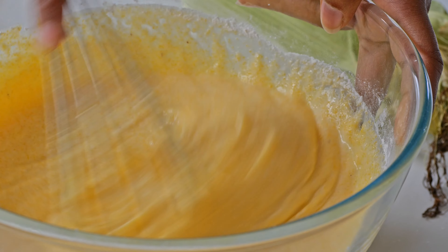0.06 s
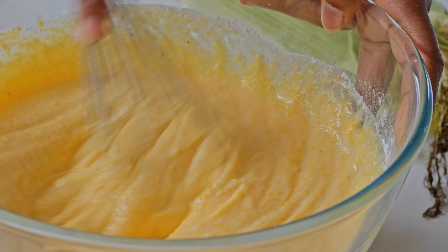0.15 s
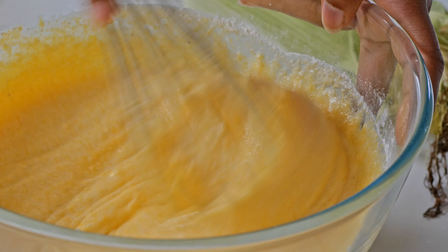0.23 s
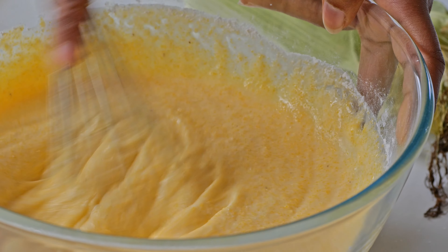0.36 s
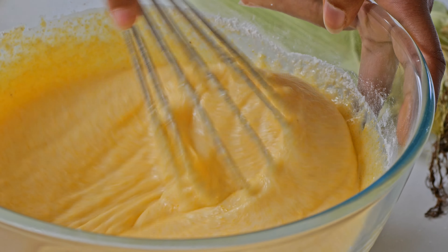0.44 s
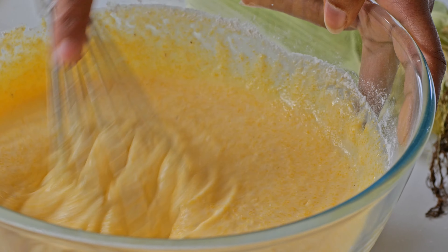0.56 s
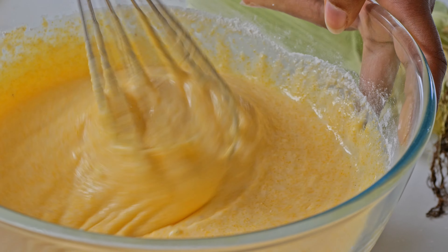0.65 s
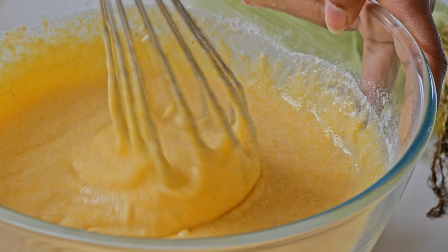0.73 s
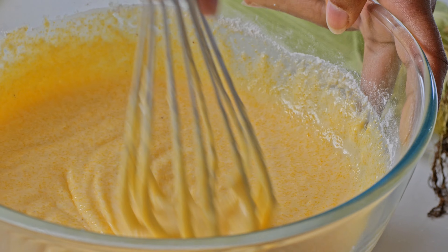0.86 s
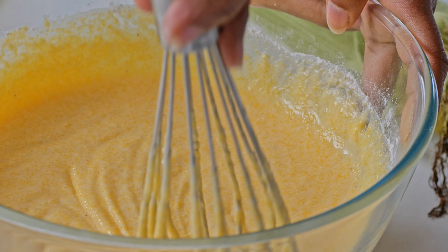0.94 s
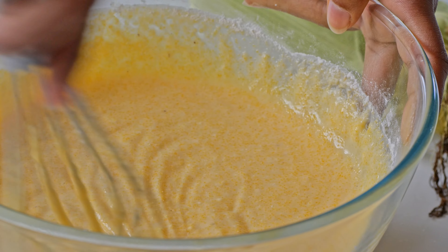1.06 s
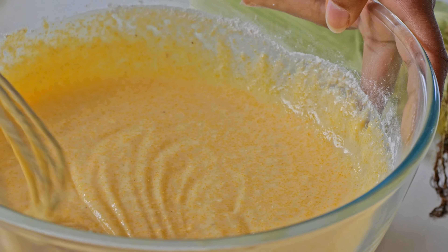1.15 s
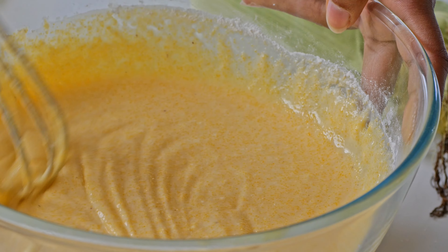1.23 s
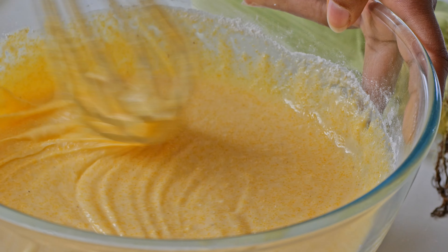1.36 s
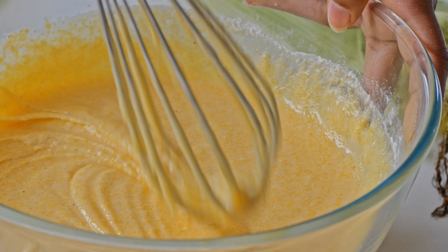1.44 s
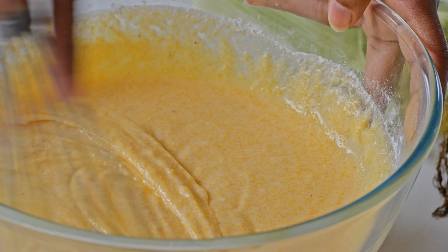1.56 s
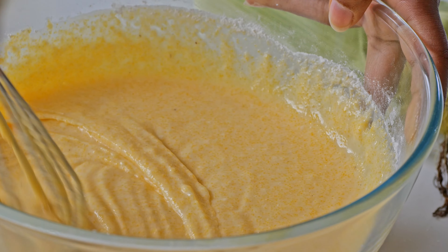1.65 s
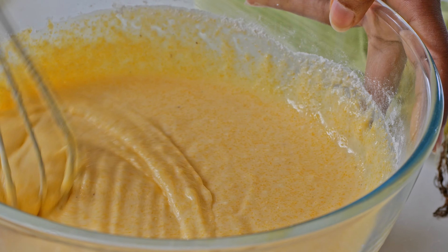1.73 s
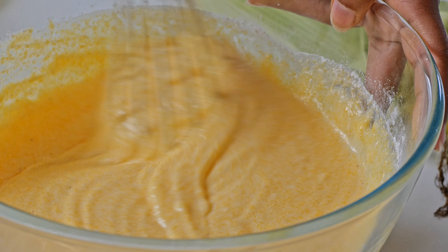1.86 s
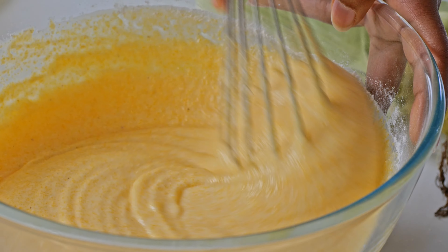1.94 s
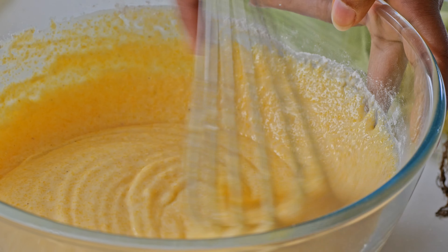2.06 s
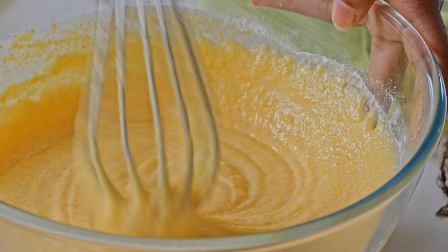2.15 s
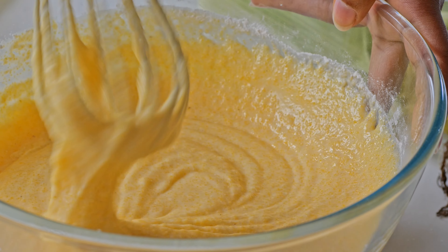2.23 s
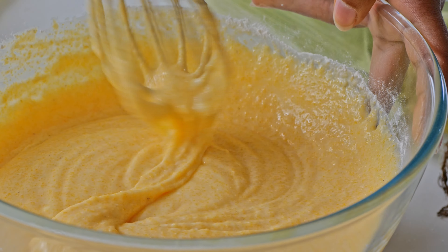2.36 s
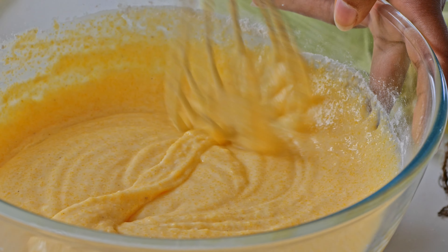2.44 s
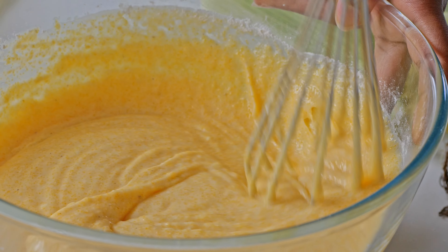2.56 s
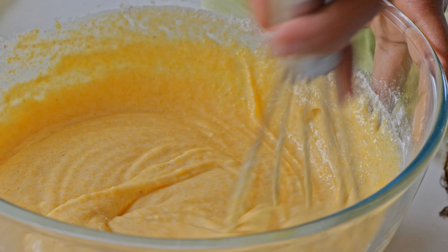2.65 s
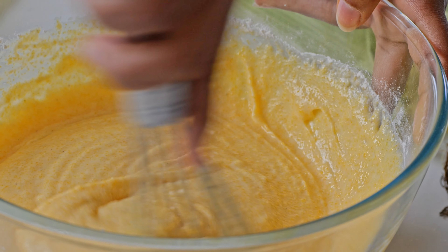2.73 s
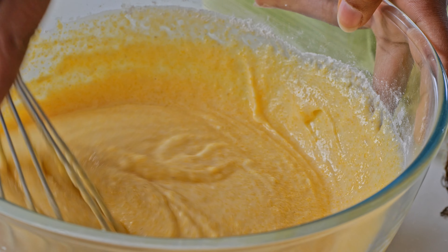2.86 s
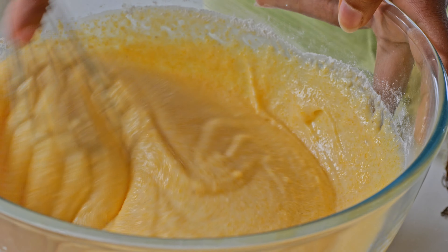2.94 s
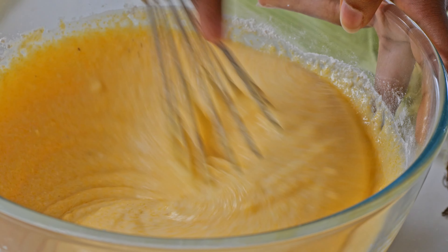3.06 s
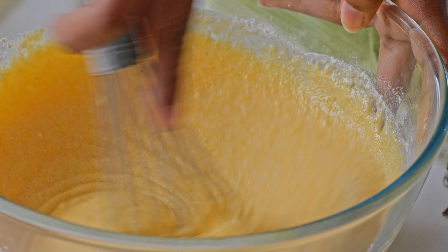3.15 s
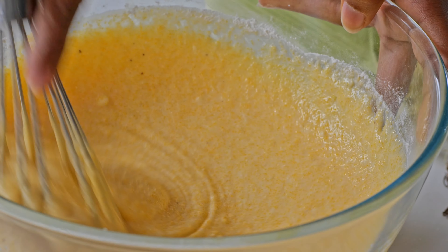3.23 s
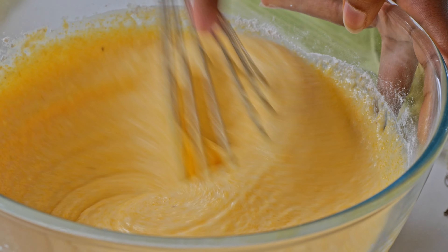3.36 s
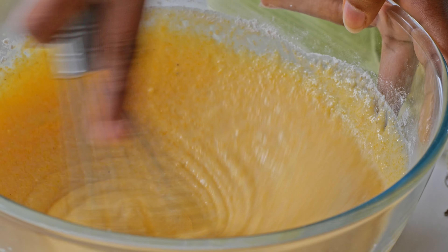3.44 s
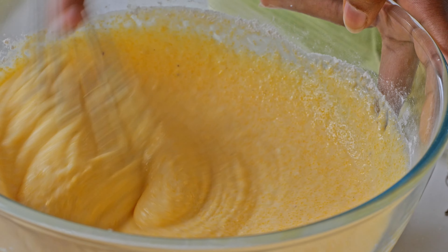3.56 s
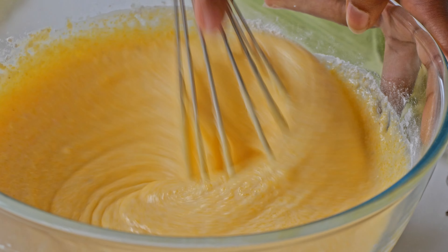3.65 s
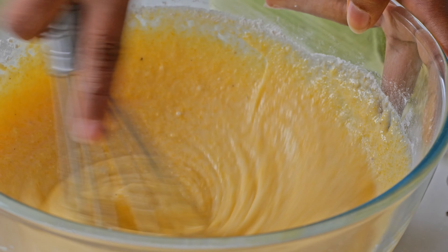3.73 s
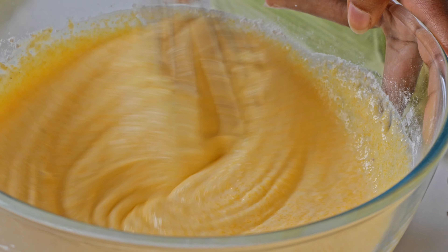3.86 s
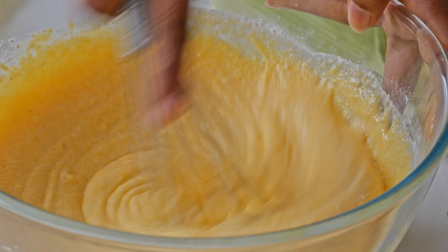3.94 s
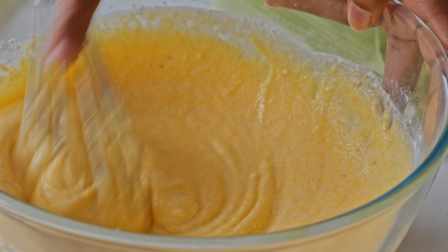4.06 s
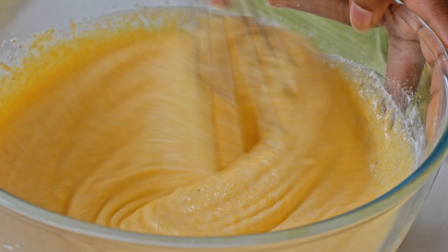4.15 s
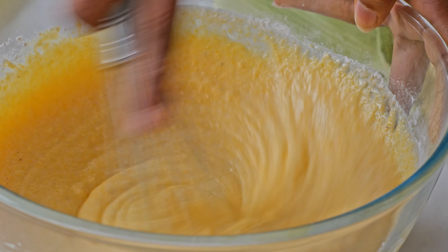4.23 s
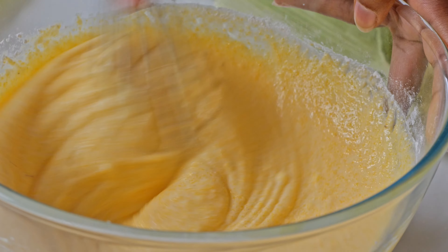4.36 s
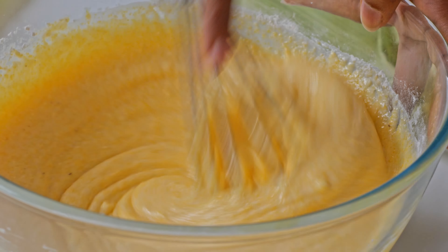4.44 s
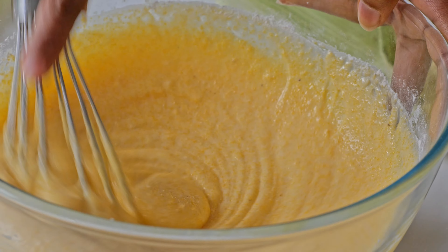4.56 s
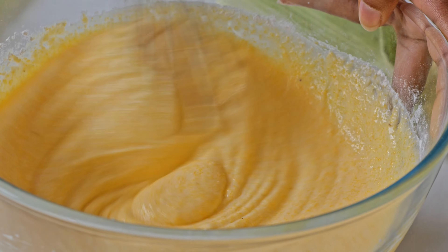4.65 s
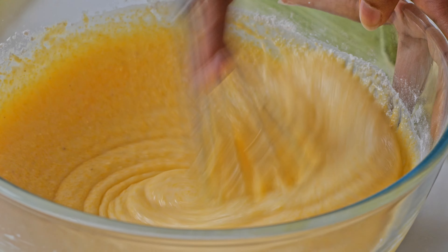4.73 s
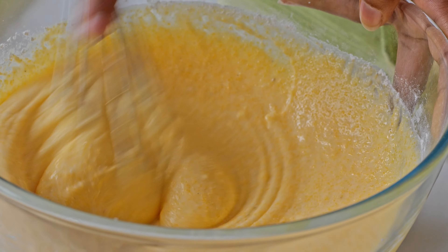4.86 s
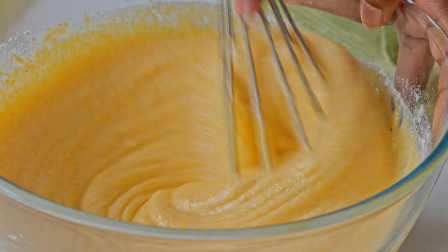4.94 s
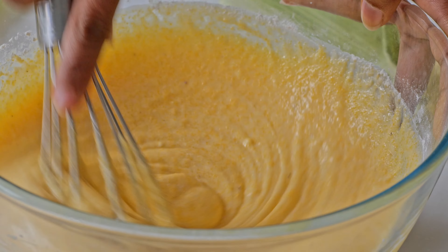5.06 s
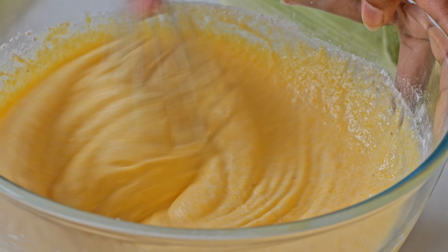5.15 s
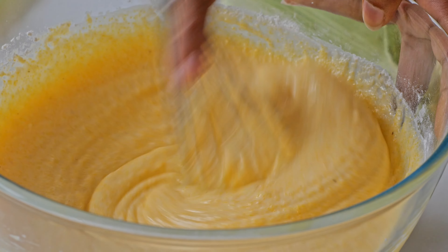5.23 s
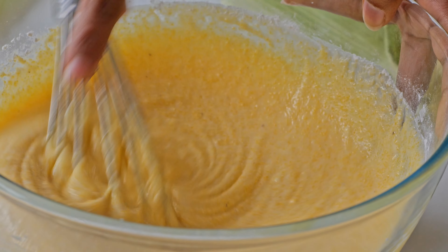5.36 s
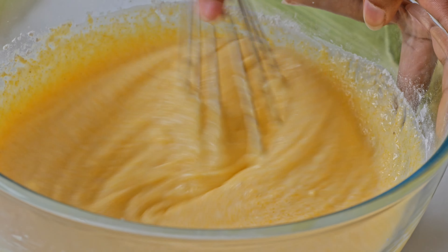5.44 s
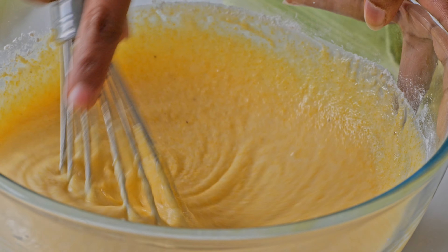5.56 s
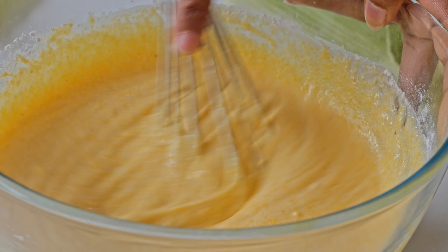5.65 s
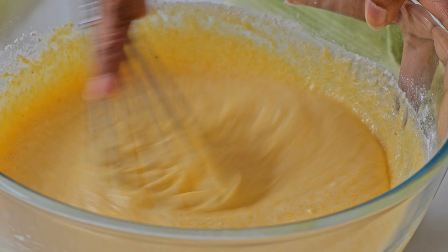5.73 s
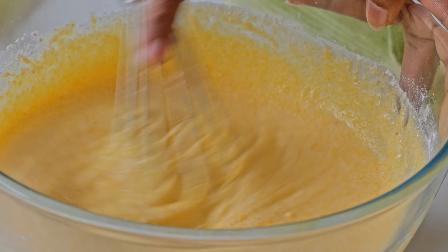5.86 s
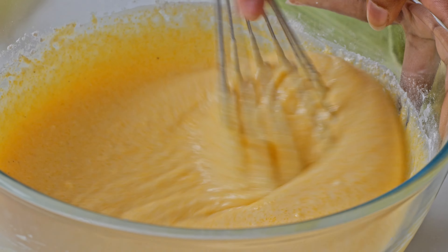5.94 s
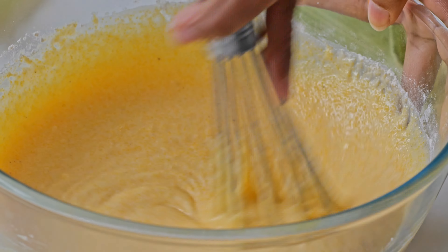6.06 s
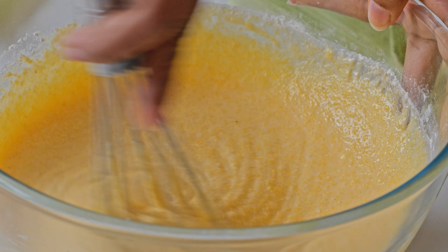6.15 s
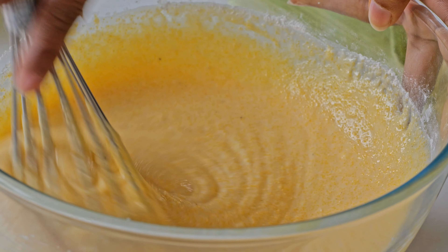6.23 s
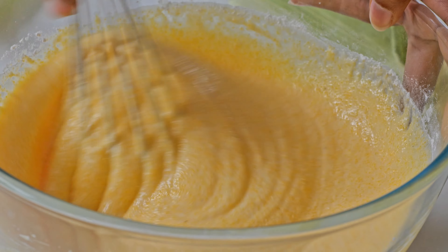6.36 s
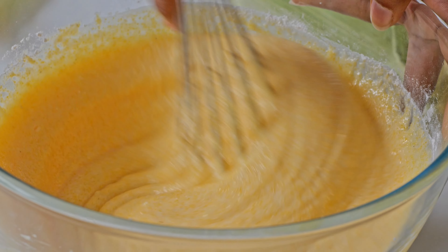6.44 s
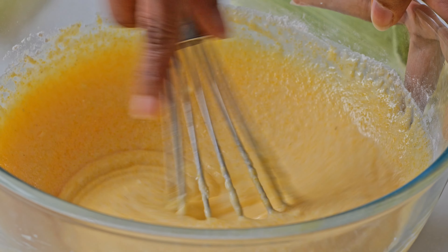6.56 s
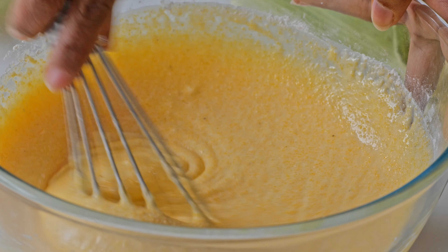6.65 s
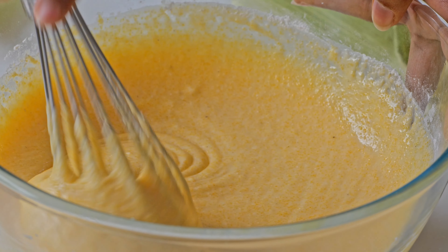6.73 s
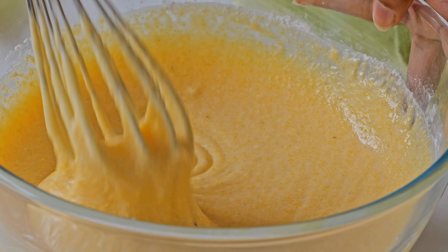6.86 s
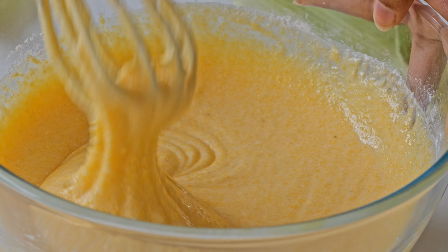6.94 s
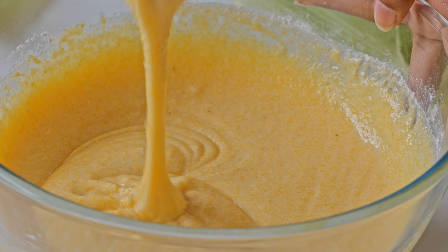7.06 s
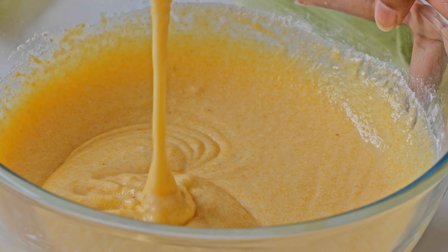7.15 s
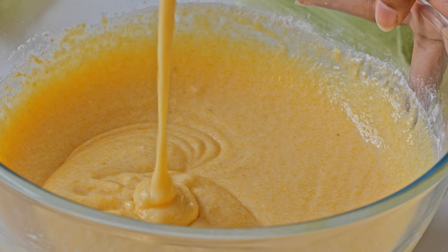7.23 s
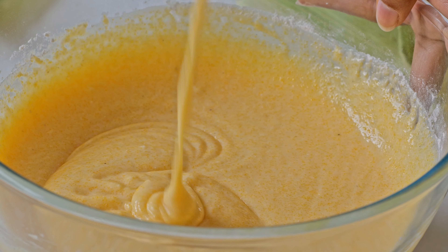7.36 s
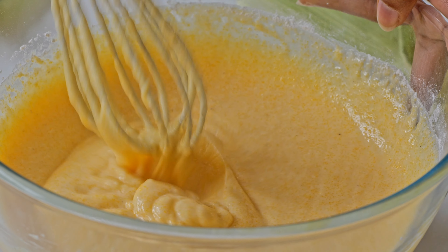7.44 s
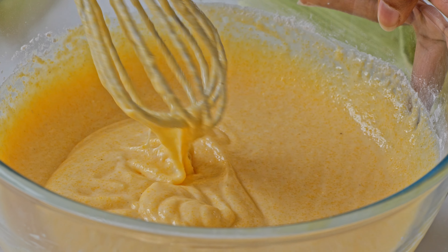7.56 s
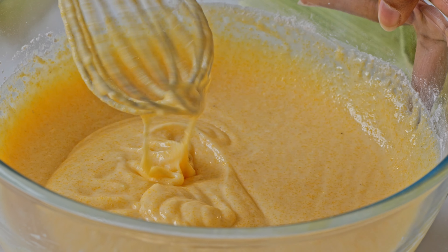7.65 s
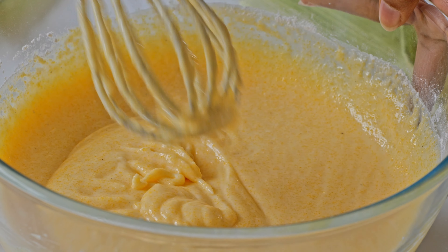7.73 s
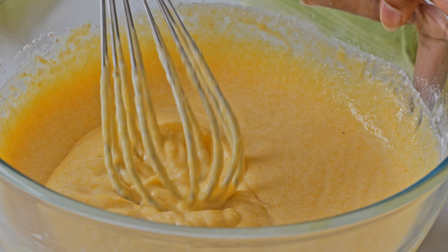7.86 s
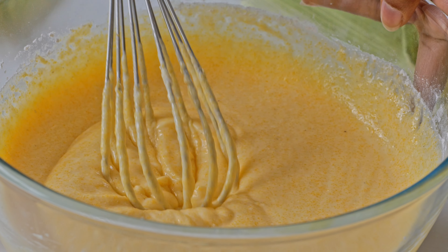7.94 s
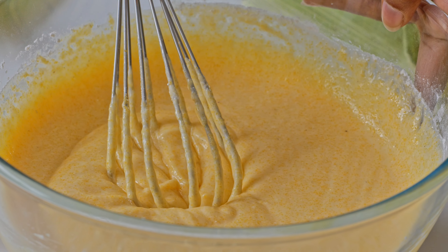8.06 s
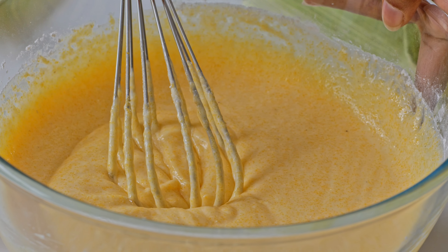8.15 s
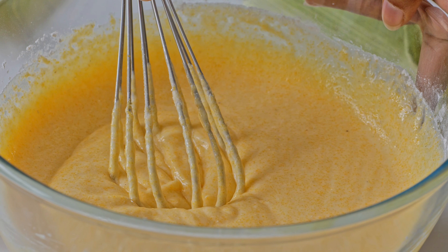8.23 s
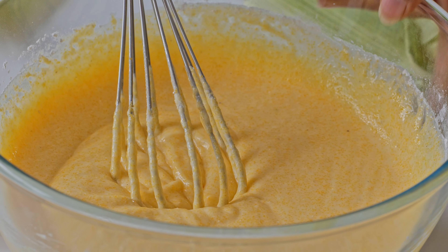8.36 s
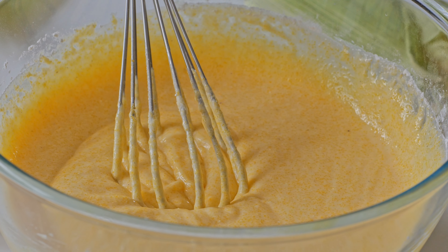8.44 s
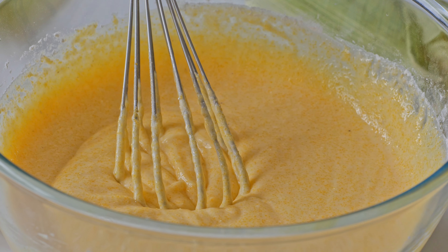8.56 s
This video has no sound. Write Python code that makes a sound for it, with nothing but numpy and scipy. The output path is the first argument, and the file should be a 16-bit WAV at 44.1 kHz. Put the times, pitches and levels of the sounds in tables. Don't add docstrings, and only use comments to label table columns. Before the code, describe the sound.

Quiet room air and a fuzzy appliance hum open the scene, with slow, soft whisk strokes in batter. One clear knock on the glass leads to a lull, then rapid hollow thuds and wire ticks gather force until metal loops clink loudly and the bowl rings. The stirring drops away, leaving soft rubs, two late taps and thin birdsong. Recorded near the bowl by phone, with lively kitchen echo.

```python
import sys
import numpy as np
from scipy import signal
from scipy.fft import rfft, irfft, next_fast_len
from scipy.io import wavfile
from scipy.ndimage import uniform_filter1d, map_coordinates

SR = 44100
rng = np.random.default_rng(int(sys.argv[2]) if len(sys.argv) > 2 else 0)


def int16_out(signal):
    q = np.round(np.clip(np.atleast_2d(signal).T, -1, 1) * 32767)
    wavfile.write(sys.argv[1], SR, q.astype(np.int16))


def gain_from_db(level_db):
    decades = np.asarray(level_db, float) / 20
    return 10 ** decades


N = 379260

# [f/Hz, level/dB]
AIR_COLOUR = [(18, -80), (30, -8.5), (145, -5), (415, -6), (1200, -11), (1760, -17), (9220, -23.5),
              (16000, -29)]
# [f/Hz, width/Hz, level/dB]
APPLIANCE = [(337, 62, -74), (582.5, 49, -73), (9540, 2600, -81.5)]
# [f/Hz, likeness 0 to 1]
AIR_LIKENESS = [(60, 0.94), (180, 1.0), (550, 0.98), (1650, 0.39), (4970, 0.45), (15000, 0.84)]
ECHO_LIKENESS = [(60, 1), (180, 1.0), (550, 0.97), (1650, 0.37), (4970, 0.73), (15000, 0.86)]
# [t/s, drag level/dB, scrape level/dB]
STIRRING = [(0, -56, -62), (.29, -68.5, -107), (1.0, -80, -70), (1.19, -56.5, -57.5), (1.45, -73, -77),
            (1.9, -56.5, -60), (2.3, -70, -87), (3.07, -53, -57), (3.45, -46.5, -64.5),
            (3.68, -44.5, -60.5), (4.599, -41, -59.5), (5.3, -46.5, -68), (5.701, -35, -63),
            (6.051, -58.5, -66), (6.55, -57.5, -61.5), (7.0, -68, -83), (8.42, -57, -70), (8.6, -60, -55)]
# [f/Hz, width/Hz, level/dB]
BOWL_MODES = [(250.5, 67, -3), (409, 94, -2.5), (631, 27, 2), (634.6, 92, -3.5), (950, 337, -11.5),
              (1086, 78, -5.5), (1600, 1100, -64)]
# [f/Hz, width/Hz, level/dB]
WIRE_MODES = [(1868, 180, 4.5), (3250, 580, -2), (5220, 1970, -5.5), (8130, 770, -2.5), (9100, 1730, -8.5),
              (12100, 3660, -10.5)]
# [f/Hz, width/Hz, level under the drag/dB]
SQUELCH_MODES = [(1300, 200, -14), (1620, 160, -20.5), (1950, 790, -19), (2440, 560, -27)]
# [t/s, peak level/dB, top resonances level/dB]
WIRE_GRAZES = [(0.64, -77, 23), (1.204, -50, -21), (3.392, -62, 13), (3.4417, -54, 9), (3.472, -55, 7),
               (3.657, -45, 2), (3.9084, -70, -19), (3.968, -52, 14.5), (4.035, -48, 2), (4.106, -46, -4),
               (4.177, -50, 8), (4.288, -60, 21), (4.331, -52.5, 5), (4.506, -54.5, 17.5),
               (4.5459, -61, 15), (4.7654, -46, 4.5), (4.826, -57, 8), (5.232, -48.5, 6.5),
               (5.2835, -59, 18), (6.098, -53, 9), (6.423, -61, 15), (6.46, -51, 0), (6.655, -62.5, 15.5),
               (7.889, -46.5, 2), (8.007, -45, -15), (8.062, -45.5, -1), (8.148, -58, 3)]
# [t/s, peak level/dB, top resonances level/dB, contact time/ms]
WIRE_TICKS = [(1.0056, -48.5, -1, 2.6), (1.234, -46.5, 1, 4.55), (1.5678, -26, 3.5, 6.4),
              (1.977, -49, 8, 3.2), (2.5057, -43, 5.5, 2.5), (3.5143, -36, 12, 5.3), (3.5226, -47, 3, 7.9),
              (3.548, -36, 8, 3.5), (3.7609, -42.5, 10, 7.4), (3.7808, -35.5, 4, 6.7),
              (3.8005, -46, 0, 4.3), (4.0642, -48, -1, 6.1), (4.6256, -50, 10.5, 4.6),
              (4.7132, -48, 3, 6.4), (4.8643, -43.5, 4.5, 6.8), (4.9896, -43.5, -1, 12),
              (5.1039, -37, 6.5, 3.7), (5.3135, -36, 1, 3.3), (5.325, -36, -7, 9.9), (5.3418, -27, 1, 7.8),
              (5.3677, -39, -7, 11), (5.4382, -32.5, 6, 10), (5.5547, -37, 2, 3.5),
              (5.5815, -27.5, -2, 6.6), (5.691, -31.5, 4, 7), (5.7926, -22, 1, 14.5),
              (5.8061, -26, -7, 3.2), (5.8175, -26.5, -5, 4.5), (5.5293, -51, 8, 6.3),
              (5.5607, -34, -3, 7.3), (5.5745, -20, 2, 5.9), (5.9094, -33, 0, 5.1), (5.9474, -48, -27, 2.4),
              (7.4926, -32, 12, 3.44), (8.524, -47.5, 2, 7.8), (8.538, -48, -6, 6.9)]
# [f/Hz, level/dB, time to fall 60 dB/s]
LOOP_MODES = [(3370, -2, 0.011), (5450, 14, 0.025), (7160, 3, 0.066), (8100, 0, 0.034), (9400, -3, 0.095),
              (11100, 6, 0.02), (13000, -2, 0.022)]
# [t/s, peak level/dB, best-excited f/Hz, spread/octaves]
RIM_KNOCKS = [(1.006, -57.5, 2480, 0.51), (1.205, -63.5, 4790, .2), (1.567, -37, 2360, 2.3),
              (1.885, -71.5, 7800, 0.15), (1.6, -44, 950, .3), (1.978, -64, 2420, 0.56),
              (1.668, -36, 1585, 0.21), (1.7, -46.5, 2495, 0.099), (1.728, -75, 1370, 0.42),
              (5.691, -28, 5170, 0.049), (5.812, -30, 5100, .04), (4.63, -57, 3500, .1),
              (5.44, -48, 4960, 0.048), (8.009, -38.5, 2545, 0.043), (8.009, -48.5, 3633, 0.04),
              (8.009, -55, 1620, 0.15), (8.15, -63, 10900, 0.087)]
# [f/Hz, level/dB, time to fall 60 dB/s]
RIM_MODES = [(377, -3, .25), (945, -3, .3), (1585, -4, .22), (1771, -8, .2), (2266, -6, .22),
             (2500, -3, .2), (3400, -6, .25), (3575, 2, .22), (4780, 4, .24), (5141, -8, .22),
             (6185, -5, .28), (7806, -4, .25), (9302, -5, .18), (11130, -8, .12)]
# [t/s, peak level/dB, boom f/Hz, counter thump level/dB]
STROKES = [(1.008, -49.5, 365, -18), (1.565, -37, 1066, -22), (1.96, -51.5, 606, -37),
           (2.508, -46, 453, -15), (3.034, -44, 448, -11), (3.136, -45.5, 454, -8), (3.149, -41, 560, -12),
           (3.179, -44.5, 500, -20), (3.37, -54.5, 1092, -23), (3.497, -43.5, 194, 0.5),
           (3.515, -35, 597, -16), (3.593, -37, 375, -35), (3.759, -37.5, 427, -13.5),
           (3.923, -38.5, 854, -43), (3.985, -46.5, 360, -3), (4.034, -36.5, 553, -14.5),
           (4.299, -38, 574, -2), (4.44, -39.5, 337, -16), (4.569, -29.5, 326, -8.5), (4.824, -45, 386, -6),
           (4.97, -36.5, 312, -17), (5.102, -34, 430, -9.5), (5.11, -43.5, 820, -37),
           (5.232, -38, 313, -38), (5.311, -34, 416, -15), (5.34, -30.5, 858, -37), (5.552, -33, 830, -23),
           (5.577, -26.5, 950, -51), (5.816, -27.5, 864, -33), (5.915, -37, 850, -46),
           (6.037, -41, 380, -12), (6.468, -45, 730, -22), (7.491, -38.5, 599, -20), (8.006, -35, 695, -15),
           (8.01, -39.5, 1640, -37), (8.05, -49, 1300, -40), (1.568, -41, 2080, -38), (1.59, -48, 760, -40),
           (6.52, -53, 600, -14), (6.581, -50, 504, -15), (3.548, -45, 1050, -32), (3.78, -40, 495, -36),
           (3.802, -47, 515, -30), (4.064, -48, 564, -15), (4.657, -37, 774, -27), (4.767, -43, 675, -28),
           (5.162, -65, 750, -28), (5.69, -39, 720, -40), (5.793, -31, 745, -44), (5.87, -34.5, 940, -42),
           (6.119, -63, 295, 1), (6.651, -58.5, 490, -11), (8.045, -38.5, 490, -32), (4.274, -55.5, 680, 6),
           (4.601, -36.5, 442, -25)]
# [f/Hz, width/Hz, level/dB]
COUNTER_MODES = [(97.5, 25, -2), (147.4, 39.4, 5)]
# [t/s, peak level/dB, f/Hz]
BATTER_POPS = [(3.032, -55, 1560), (3.3717, -56, 1500), (3.5153, -44, 1810), (3.547, -39, 1900),
               (3.6588, -41.5, 1620), (3.7804, -44, 1950), (3.8015, -43, 1920), (3.909, -45, 1720),
               (3.969, -53, 2400), (4.065, -43, 1930), (4.1105, -50.5, 2220), (4.1789, -52, 2030),
               (1.962, -51, 1180), (3.761, -44, 1180), (4.305, -60, 1950), (4.332, -44.5, 1900),
               (4.4064, -63, 1800), (4.474, -44, 1520), (4.7142, -42, 1870), (4.7667, -45.5, 1560),
               (4.8644, -42.5, 1930), (4.972, -47, 1600), (5.1043, -50, 1430), (5.22, -51, 1500),
               (5.344, -33.5, 1914), (5.5792, -41, 3470), (5.8189, -30.5, 1710), (6.053, -51.5, 1805),
               (7.391, -56.5, 2520), (7.67, -55, 2300)]
# [t/s, peak level/dB, f/Hz, time to fall 60 dB/s]
BOWL_RINGS = [(8.01, -45.5, 494, 0.82), (8.01, -47, 715, 0.32), (8.01, -43, 279.4, 0.54),
              (8.01, -40, 1000, 0.16), (8.01, -52, 1140, 0.17), (8.01, -55, 1662, 0.26),
              (8.01, -80, 1970, 0.45), (5.578, -36, 984, 0.33), (5.578, -27.5, 379, 0.24),
              (5.58, -39, 253, 0.22), (5.6, -55, 1240, 0.08), (5.806, -33.5, 930, 0.33),
              (5.8, -30, 431.6, 0.3), (5.81, -32, 237, .2), (5.806, -31.5, 1200, 0.15),
              (5.81, -39.5, 1867, 0.093), (5.84, -48, 1800, 0.15), (5.343, -34.5, 934, 0.22),
              (5.343, -48, 423, 0.16), (7.494, -50, 558, 0.66), (7.494, -51, 837, 0.18),
              (7.494, -46.5, 241, 0.46), (3.517, -48, 1085, 0.27), (3.517, -38.5, 443, 0.27),
              (3.78, -35, 446, .25), (3.78, -44, 614, 0.28), (3.15, -55, 503, 0.18), (3.15, -49, 864, .15),
              (3.92, -55, 886, 0.13), (4.3, -42, 335.4, 0.26), (4.3, -50, 587, .2), (4.57, -46, 391, 0.2)]
WHISTLE_NOTES = [(3.3, .14, 2000, 2000, 1980), (4.05, .12, 2400, 2330, 2220), (4.52, .1, 2060, 2065, 2070),
                 (4.685, .025, 2070, 2070, 2070), (4.82, .135, 2070, 2060, 2070),
                 (5.245, .045, 2330, 2250, 2260), (5.39, .15, 2380, 2300, 2170),
                 (6.72, .15, 2420, 2540, 2550), (7.31, .05, 3980, 3980, 3980),
                 (8.46, .08, 2330, 2330, 2300), (3.555, .1, 3170, 3140, 3050),
                 (8.53, .07, 2650, 2700, 2700), (4.435, .08, 2100, 2080, 2070)]
WHISTLE_LEVELS = [-73, -66, -61, -57, -56.5, -58, -54.5, -62.5, -81, -63, -66, -72, -61]
# [t/s, length/s, start f/Hz, middle f/Hz, end f/Hz]
CHIRP_NOTES = [(s, .07, 3700, 3450, 3440) for s in (7.025, 7.315, 7.61, 7.91, 8.225)]
FALLING_NOTES = [(s, .022, 2700, 2150, 1750) for s in (6.772, 7.088, 7.38, 7.662, 7.962, 8.285)]
HELD_NOTES = [(s, .07, 2600, 2540, 2570) for s in (6.775, 7.085, 7.345, 7.66, 7.95, 8.24)]
CHIRP_LEVELS = [-76, -77, -81, -77, -79]
FALLING_LEVELS = [-66, -68, -71, -69, -69, -73]
HELD_LEVELS = [-69, -72, -80, -83, -80, -80]
# [t/s, peak level/dB, f/Hz]
WIRE_SNICKS = [(3.5146, -37, 9800), (3.547, -29, 9870), (3.7605, -42, 11400), (3.78, -38, 10000),
               (3.969, -53, 9700), (4.1776, -54, 12100), (4.2893, -45, 10900), (4.5073, -51, 10700),
               (4.624, -45, 9400), (4.713, -54, 9000), (4.7667, -54, 11300), (4.8645, -46, 9340),
               (4.9902, -49, 9010), (5.105, -36, 10130), (5.2302, -52, 11100), (5.2835, -52, 10500)]
# [t/s, peak level/dB, f/Hz]
WIRE_CLASHES = [(5.2838, -52, 10600), (5.315, -37, 10500), (5.3427, -32, 10800), (5.3686, -44, 9310),
                (5.4385, -38, 8600), (5.5288, -44, 8130), (5.5607, -39, 12000), (5.5801, -23.5, 10800),
                (5.691, -27, 12300), (5.7847, -39, 10300), (5.7935, -27, 13300), (5.8061, -19, 7820),
                (5.9099, -33, 12300)]
# [t/s, peak level/dB, f/Hz]
WIRE_CLINKS = [
    (5.3138, -37.5, 3500),
    (5.3442, -31, 3620),
    (5.4375, -41, 4880),
    (5.554, -39, 3360),
    (5.5811, -21, 3640),
    (5.6934, -22.5, 5060),
    (5.8016, -33, 3110),
    (5.8053, -19, 3353),
    (5.8176, -27.5, 3260),
]
# [f/Hz, time to fall 60 dB/s]
KITCHEN_DECAY = [(100, 0.39), (300, 0.64), (1000, 0.7), (4000, 0.66), (12000, 0.27)]


def unit(x):
    return x / np.sqrt(np.mean(x ** 2) + 1e-20)


def peak(x):
    return x / abs(x).max()


def along(points, hz):
    f, v = np.transpose(points)
    return np.interp(np.log(hz + 1), np.log(f + 1), v)


def filtered(x, response):
    m = next_fast_len(x.shape[-1] + SR // 4)
    spectrum = rfft(x, m) * response(np.fft.rfftfreq(m, 1 / SR))
    return irfft(spectrum, m)[..., :x.shape[-1]]


def body(peaks):
    def response(f):
        total = 0
        for k, (c, w, db) in enumerate(peaks):
            total = total + (-1) ** k * gain_from_db(db) * 1j * f * w / (c * c - f * f + 1j * f * w)
        return total
    return response


def spread(pair, alike):
    def mid_side(hz):
        turn = np.arccos(np.clip(along(alike, hz), -1, 1)) / 2
        return np.array([np.cos(turn), np.sin(turn)])
    mid, side = filtered(pair, mid_side)
    return np.array([mid + side, mid - side])


def add(track, s, sound):
    part = track[round(s * SR):][:len(sound)]
    part += sound[:len(part)]


def wander(size, position):
    return map_coordinates(rng.standard_normal(size), [position])


def burst(rise_ms, fade_ms):
    ms = np.arange(SR // 8) * 1000 / SR
    swell = np.clip(ms / max(rise_ms, .1), 0, 1) ** 2
    fade = np.exp(-np.clip(ms - rise_ms, 0, None) / max(fade_ms, .2))
    return rng.standard_normal(len(ms)) * swell * fade


def grit(rate, spread_db):
    slips = rng.random(N) < rate / SR
    return unit(slips * rng.standard_normal(N) * gain_from_db(spread_db * rng.standard_normal(N)))


def after(rows, gain_db, rise_s, fade_s):
    out, t = np.zeros(N), np.arange(SR // 2) / SR
    shape = (1 - np.exp(-t / rise_s)) * np.exp(-t / fade_s)
    for s, db, *_ in rows:
        add(out, s, gain_from_db(db + gain_db) * shape)
    return out


def waver(count, t):
    gains = []
    for row in rng.standard_normal((count, 200)):
        slow = gain_from_db(4 * map_coordinates(row, [t * 60]))
        rattle = 0.6 * map_coordinates(row[::-1], [t * 320])
        gains.append(slow + rattle)
    return np.array(gains)


def air():
    hiss = rng.standard_normal((2, N))
    total = gain_from_db(-67.5) * unit(filtered(hiss, lambda f: gain_from_db(along(AIR_COLOUR, f))))
    for c, w, db in APPLIANCE:
        noise = rng.standard_normal((2, N))
        total = total + gain_from_db(db) * unit(filtered(noise, lambda f: body([(c, w, 0)])(f) ** 2))
    return spread(total, AIR_LIKENESS)


def squelch():
    total, swing_db = np.zeros(N), 4
    for c, w, db in SQUELCH_MODES:
        swing = wander(300, np.arange(N) * 25 / SR)
        total += gain_from_db(db + swing_db * swing) * unit(filtered(grit(400, spread_db=3.0), body([(c, w, 0)])))
    return total


def stirring():
    s, drag_db, scrape_db = np.transpose(STIRRING)
    t = np.arange(N) / SR
    slips, scratches = grit(750, spread_db=4.2), grit(1800, spread_db=3.5)
    drag = unit(filtered(slips, body(BOWL_MODES + [(142.4, 48, -5.0), (1800, 310, -35.0)])))
    scrape = unit(filtered(scratches, lambda f: body(WIRE_MODES)(f) * (f / 5000) ** 0.73 + 0.11 * f / (f + 3000)))
    churn = gain_from_db(np.interp(t, s, drag_db) - 11.5) + after(STROKES, -24, rise_s=0.014, fade_s=0.023)
    skid = gain_from_db(np.interp(t, s, scrape_db) - 10.5) + after(WIRE_TICKS, -27, rise_s=0.0013, fade_s=0.057)
    return churn * (drag + squelch()) + skid * scrape


def ticks():
    graze_ms, grain_db, share_db, shift = 7.2, 5, 3, 0.06
    contacts = WIRE_TICKS + [(*row, graze_ms) for row in WIRE_GRAZES]
    out, chance = np.zeros(N), rng.standard_normal((len(contacts), 2, len(WIRE_MODES)))
    for (s, db, top_db, ms), (share_luck, pitch_luck) in zip(contacts, chance):
        lowest_db = -6.5 - 0.1659 * (db + 50)
        second_db = -5.5 + 0.1165 * (db + 50)
        shares = np.array([lowest_db, second_db, -3, -3, top_db - 3, top_db - 3]) + share_db * share_luck
        peaks = []
        for (c, w, g), share, luck in zip(WIRE_MODES, shares, pitch_luck):
            peaks.append((c * (1 + shift * luck), 0.67 * w, g + share))
        rise_ms = .33 * ms ** 1.8
        force = burst(rise_ms, ms)
        grain = np.repeat(rng.standard_normal(SR // 80 + 1), 10)[:SR // 8]
        force = peak(force * gain_from_db(grain_db * grain))
        add(out, s - 0.49 * rise_ms / 1000, gain_from_db(db + 15) * filtered(force, body(peaks)))
    loops = body([(hz, 0.98 / t60, db) for hz, db, t60 in LOOP_MODES])
    return out + gain_from_db(-12.5) * filtered(out, loops)


def rim():
    out, t = np.zeros(N), np.arange(SR // 2) / SR
    hz, level_db, t60 = np.transpose(RIM_MODES)[:, :, None]
    for s, db, best_hz, octaves in RIM_KNOCKS:
        luck = rng.uniform(-2.41, 1, (2, len(RIM_MODES), 1))
        cluster = np.sin(2 * np.pi * hz * t)
        cluster += .7 * np.sin(2 * np.pi * hz * (1 + .012 * luck[0]) * t + 3 * luck[1])
        cluster += .35 * np.sin(2 * np.pi * hz * (1 - .022 * luck[1]) * t)
        reach_db = -6 * (np.log2(hz / best_hz) / octaves) ** 2
        fade = gain_from_db(level_db + reach_db - 60 * t / t60)
        ringing = (fade * cluster * waver(len(RIM_MODES), t)).sum(0)
        add(out, s, gain_from_db(db - 9.0) * ringing * (1 - np.exp(-t / 0.0006)))
    return out


def thuds():
    bowl, counter = np.zeros((2, N))
    push_ms, reach_db = 7.35, -0.5
    splat = (1100, 445, -9.5)
    dip = body([(1415, 124, -3.9)])
    for s, db, hz, thump_db in STROKES:
        push = burst(0.28 * push_ms, push_ms)
        driven = [(c, w, g + reach_db * np.log2(c / hz) ** 2) for c, w, g in BOWL_MODES]
        struck = body(driven + [(hz, 0.13 * hz, 3), splat])
        boom = filtered(push, lambda f: struck(f) * (1 - dip(f)) / (1 + 1j * f / 1500))
        thump = filtered(push, lambda f: body(COUNTER_MODES)(f) / (1 + 1j * f / 200))
        add(bowl, s - .001, gain_from_db(db) * peak(boom))
        add(counter, s, gain_from_db(db + thump_db + 8.5) * peak(thump))
    return bowl, counter


def pops():
    out, t = np.zeros(N), np.arange(SR // 10) / SR
    t60_s = .022
    for s, db, hz in BATTER_POPS:
        tone = np.sin(2 * np.pi * hz * t * (1 + 6 * t)) + 0.39 * np.sin(3.2 * np.pi * hz * t)
        add(out, s, gain_from_db(db + 3.5 - 60 * t / t60_s) * tone * (1 - np.exp(-t / 0.0015)))
    return out


def rings(rows, beat):
    out, t = np.zeros(N), np.arange(SR // 2) / SR
    lucks = rng.uniform(-0.86, 1, (len(rows), 2))
    for (s, db, hz, t60), luck, gain in zip(rows, lucks, waver(len(rows), t)):
        twin = np.sin(2 * np.pi * hz * (1 + beat * luck[0]) * t + np.pi * luck[1])
        pair = np.sin(2 * np.pi * hz * t) + .5 * twin
        fade = gain_from_db(db - 60 * t / max(t60, .005))
        add(out, s, fade * gain * pair * (1 - np.exp(-t * hz / 2)))
    return out


def bird(notes, levels_db, flutter_db, flutter_hz, octave):
    out = np.zeros(N)
    for (s, length, *pitch_hz), db in zip(notes, levels_db):
        u = np.linspace(0, 1, round(length * SR))
        glide_hz = np.polyval(np.polyfit([0, .5, 1], pitch_hz, deg=2), u)
        warble = 1 + .005 * unit(uniform_filter1d(rng.standard_normal(len(u)), size=150))
        phase = 2 * np.pi * np.cumsum(glide_hz * warble) / SR
        add(out, s, gain_from_db(db) * np.sin(np.pi * u) ** 0.069 * (np.sin(phase) + octave * np.sin(2 * phase)))
    return out * gain_from_db(flutter_db * wander(2400, np.arange(N) * flutter_hz / SR))


def birds():
    far_notes = CHIRP_NOTES + FALLING_NOTES + HELD_NOTES + [(8.404, .02, 2500, 2150, 1500)]
    far_levels = CHIRP_LEVELS + FALLING_LEVELS + HELD_LEVELS + [-60]
    whistle = bird(WHISTLE_NOTES, WHISTLE_LEVELS, flutter_db=2.5, flutter_hz=90, octave=.08)
    chirp = bird(far_notes, far_levels, flutter_db=5, flutter_hz=260, octave=.2)
    return whistle, chirp


def clashes():
    t60_s = 0.021
    events = WIRE_CLASHES + WIRE_CLINKS + WIRE_SNICKS
    return rings([(s, db - 10, hz, t60_s) for s, db, hz in events], beat=0.055)


def yard():
    start_s, db, hz, width_hz = 7, -74.5, 2194, 1300
    t = np.arange(N) / SR
    flicker = wander(200, t * 14)
    band = unit(filtered(rng.standard_normal((2, N)), lambda f: body([(hz, width_hz, 0)])(f) ** 2))
    return gain_from_db(db + 3.5 * flicker) * np.clip((t - start_s) * 10, 0, 1) * spread(band, ECHO_LIKENESS)


def kitchen(x):
    out, step = np.zeros((2, N + SR * 2)), SR // 4
    for i in range(0, N, step):
        hz, t, z = signal.stft(rng.standard_normal((2, SR * 3 // 4)), SR, nperseg=256)
        fade = gain_from_db(-60 * t / along(KITCHEN_DECAY, hz)[:, None])
        tail = signal.istft(z * fade, SR, nperseg=256)[1]
        wet = signal.fftconvolve(x[None, i:i + step], tail / np.linalg.norm(tail[0]), axes=1)
        out[:, i + 130:i + 130 + wet.shape[1]] += wet
    return spread(out[:, :N], ECHO_LIKENESS)


def counter_bounce(near):
    delay_s = np.array([[.3], [.42]]) / 1000
    return filtered(near, lambda f: gain_from_db(-9) * f * f / (f * f + 10000 ** 2) * np.exp(-2j * np.pi * f * delay_s))


def scene():
    high = ticks()
    low, thump = thuds()
    glass, stir = rim(), stirring()
    whistle, chirp = birds()
    pop = pops()
    high = high + clashes()
    ring = gain_from_db(-1.5) * rings(BOWL_RINGS, beat=0.032)
    near = high + low + thump + glass + stir + pop + ring
    wet = gain_from_db(-5) * high + gain_from_db(-11) * pop + gain_from_db(-10) * whistle + gain_from_db(-5) * stir + gain_from_db(1.5) * chirp
    wet = wet + gain_from_db(-9.5) * ring + gain_from_db(2.5) * low + gain_from_db(-3.0) * thump + gain_from_db(-3.0) * glass
    both = near + counter_bounce(near) + kitchen(wet) + air() + yard()
    both = both + (whistle + chirp) * gain_from_db([[-1.5], [-6]])
    return filtered(both, lambda f: gain_from_db(np.outer([.45, -.45], f * f / (f * f + 400 ** 2))))


def top_cut(x):
    return signal.sosfilt(signal.butter(12, 16500, fs=SR, output="sos"), x)


def record(dry):
    def band(f):
        return (1j * f / (75 + 1j * f)) ** 4 * np.where(f < 15800, 1, gain_from_db(-48))
    mix = filtered(dry, band)
    return top_cut(mix)


dry = scene()
out = record(dry)
int16_out(out)
```